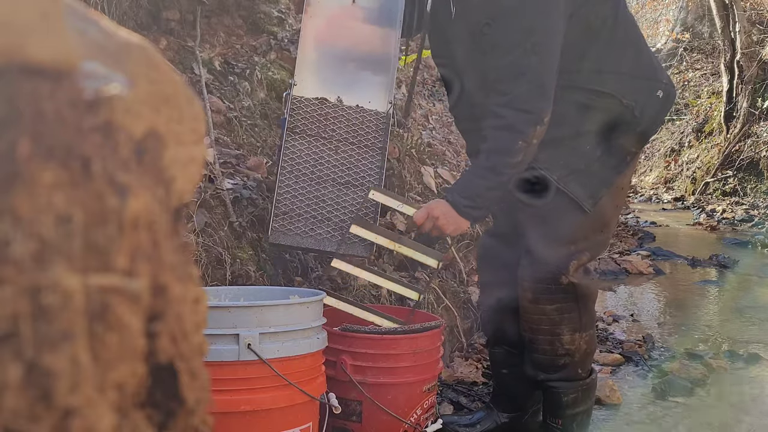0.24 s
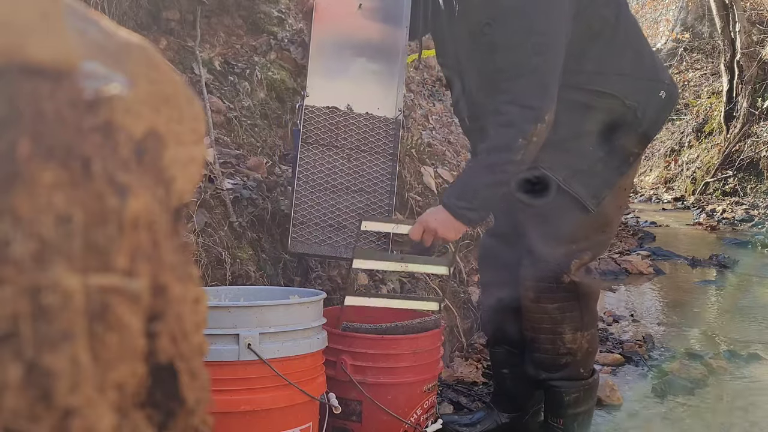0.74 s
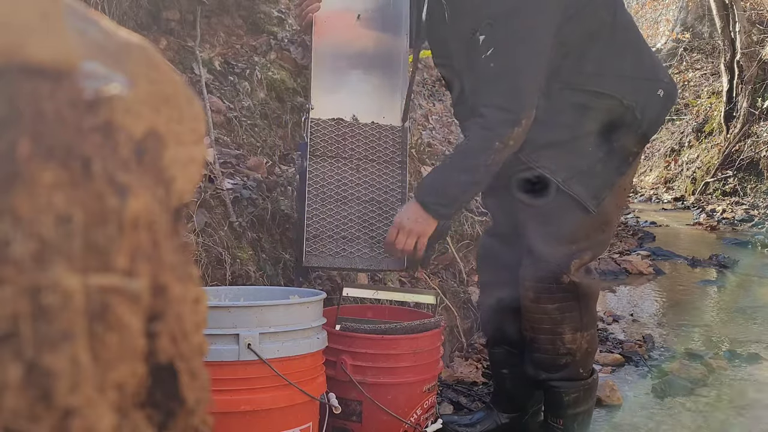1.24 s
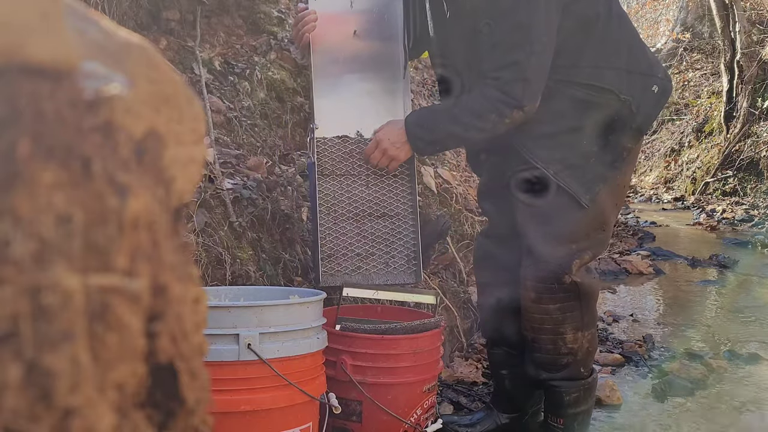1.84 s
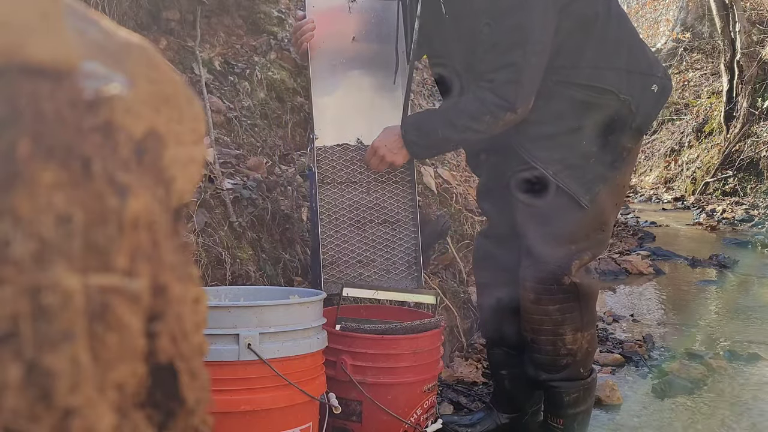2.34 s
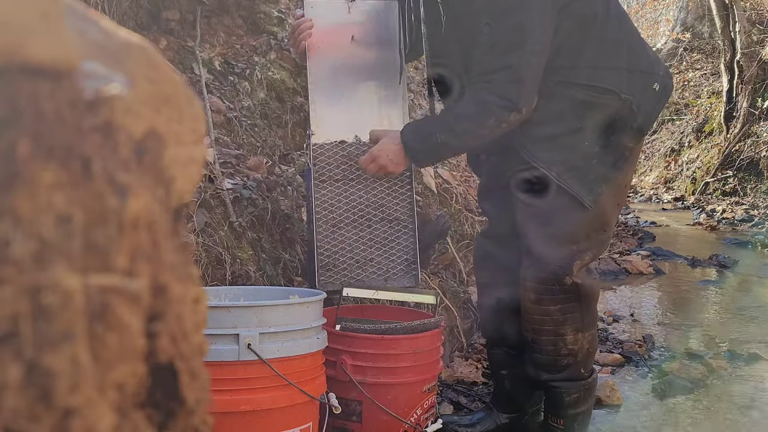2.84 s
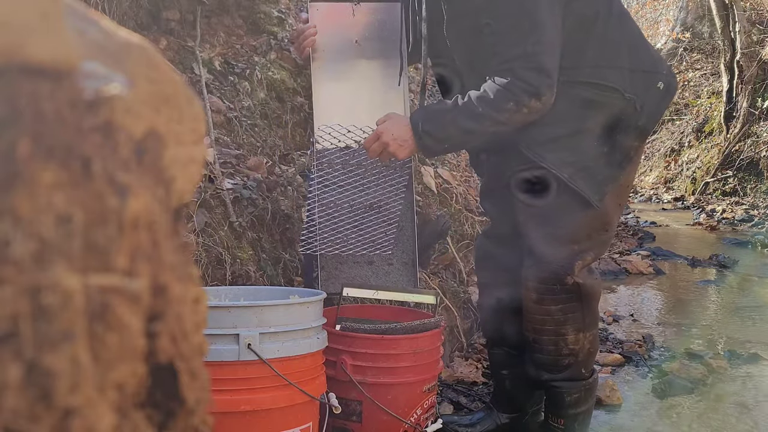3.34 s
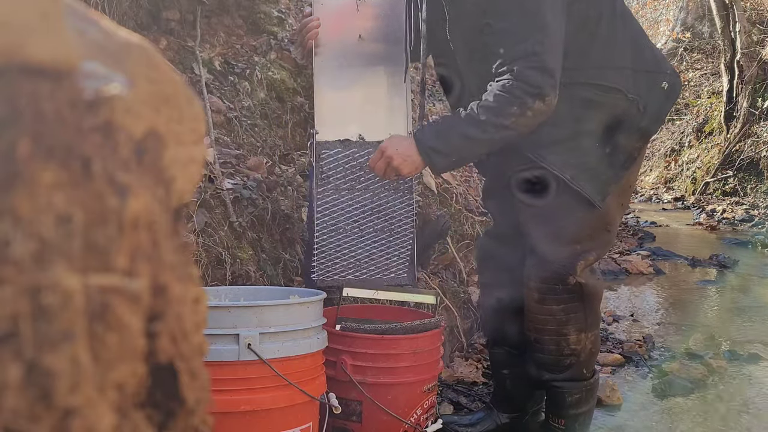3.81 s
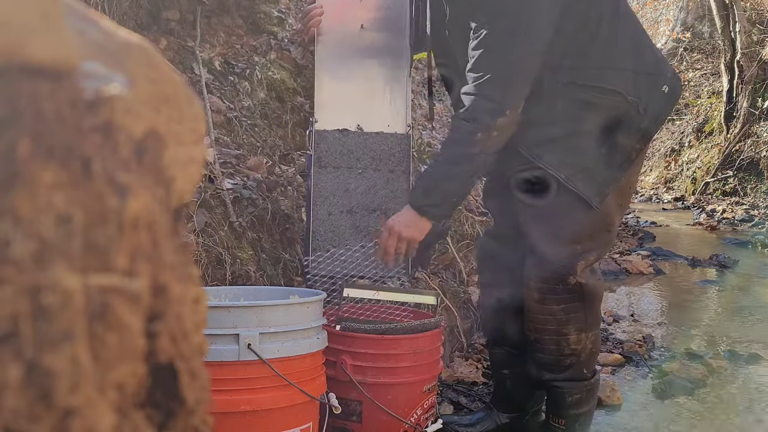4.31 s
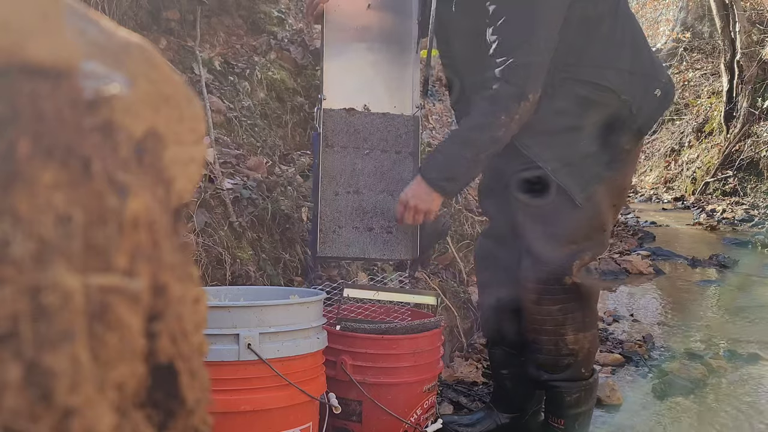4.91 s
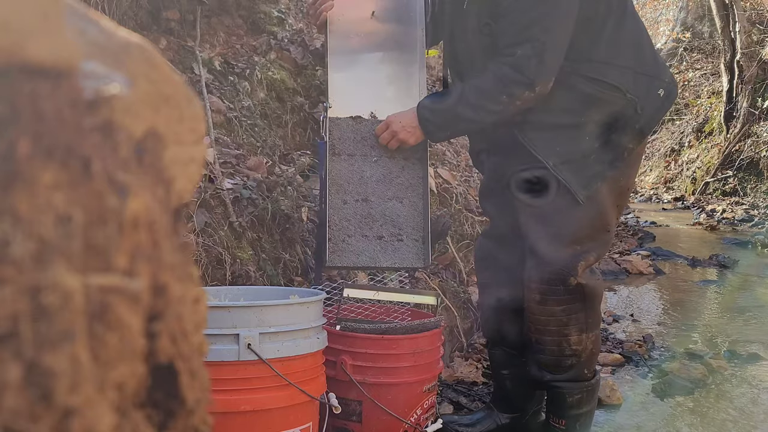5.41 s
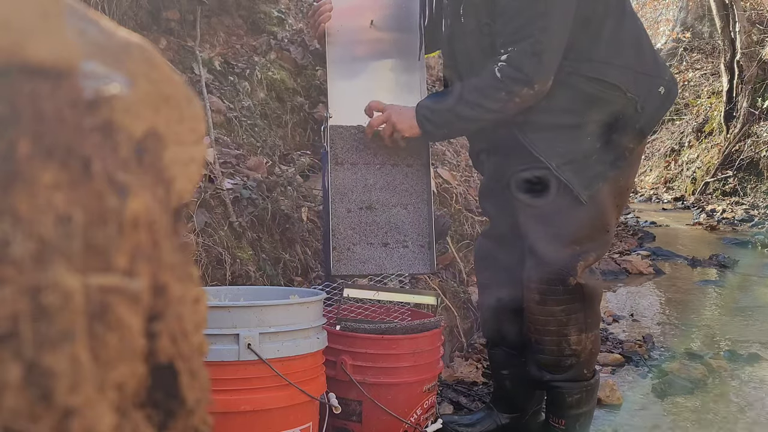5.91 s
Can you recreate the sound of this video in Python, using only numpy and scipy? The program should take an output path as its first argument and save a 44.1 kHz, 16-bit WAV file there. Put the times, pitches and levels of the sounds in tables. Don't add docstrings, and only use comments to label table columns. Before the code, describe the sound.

A close outdoor take of rinsing gear at a stream.

```python
import sys
import numpy as np
from scipy import signal
from scipy.fft import rfft, irfft
from scipy.io import wavfile
from scipy.ndimage import uniform_filter1d

SR = 44100
rng = np.random.default_rng(int(sys.argv[2]) if len(sys.argv) > 2 else 0)


def put_to_file(sound):
    columns = np.atleast_2d(sound).T
    safe = np.clip(columns, -1, 1)
    whole_steps = np.round(safe * 32767)
    wavfile.write(sys.argv[1], SR, whole_steps.astype(np.int16))


def makeup_ratio(level_db):
    decades = np.asarray(level_db, float) / 20
    return 10 ** decades


N = 271656
HZ = np.fft.rfftfreq(N, 1 / SR) + 1e-3


# (frequency in Hz, level in dB, t60 in seconds).
KNOCKS = [
    ([(.5108, -4.5), (.5122, -9), (.5148, -16), (.5178, -8), (.521, -20)], [(274, -15, 0.061), (634, -4, 0.021), (1400, -7, 0.012), (1650, 0, 0.011), (1980, -10, 0.018), (3180, -12, .009), (4200, -9, .011), (4700, -5, 0.012)]),
    ([(.0073, -12), (.0089, -14.5), (.0119, -22)], [(1200, -2.5, 0.024), (1642, -2, .017), (1880, -2, 0.017), (3800, -23, .012)]),
    ([(.683, -2.5), (.685, -11), (.6885, -3.5), (.693, -17)], [(245, -10, 0.11), (413, -8.5, 0.16), (750, -15, 0.067), (1260, -5, 0.021), (1700, -18, .04), (1880, -11, .04), (3480, -24, 0.038), (3860, -13, 0.014), (6830, -18, 0.018)]),
    ([(.748, -24), (.79, -26)], [(6300, -12, .05), (7100, -1.5, 0.13), (8460, -0.5, .07)]),
    ([(1.04, -19), (1.052, -12.5), (1.066, -15)], [(3790, -10.5, .05), (5640, -2, 0.081), (6990, -10, 0.064), (11300, -8, 0.089)]),
          ([(2.615, -15.5), (2.618, -11.5), (2.628, -16.5)], [(292, -0.5, 0.045), (568, -0.5, 0.11), (1410, -18, 0.043), (1830, -9, .03)]),
    ([(3.1035, -16), (3.109, -15), (3.113, -26), (3.14, -20)], [(727, -4.5, 0.041), (884, -6.5, 0.039), (1750, -7, .025), (2730, -16, 0.042)]),
    ([(4.3578, -13.5), (4.360, -16.5), (4.3625, -17), (4.365, -16), (4.3665, -25)], [(134, -14, .15), (207, -4.5, 0.18), (368, -8, 0.15), (560, -4.5, 0.056), (866, 2, 0.017), (1230, -2, 0.02), (1700, 0.5, 0.025), (2100, -23, .03)]),
    ([(4.6455, -18), (4.648, -20), (4.652, -24.5), (4.666, -20), (4.678, -25)], [(206, -10, 0.064), (392, -3.5, 0.05), (530, -7, 0.045), (840, -3, 0.033), (1250, -3.5, 0.021), (1710, -5, .025)]),
    ([(4.5865, -12), (4.589, -21)], [(2234, -4.5, 0.015), (2885, 2, .012), (3500, -7, .01), (4160, -8, .012)]),
    ([(4.616, -16), (4.6235, -25)], [(2900, -12, .012), (3980, -3.5, 0.029), (5100, -8, .015)]),
]
CRACK_DB, CRACK_T60_S = -5.5, 0.014


def knocks():
    out, t = np.zeros(N), np.arange(2000) / SR
    for contacts, modes in KNOCKS:
        start, clicks = contacts[0][0] - .01, np.zeros(SR // 3)
        for s, blow_db in contacts:
            clicks[round((s - start) * SR)] = makeup_ratio(blow_db)
            crack = band(rng.standard_normal(len(t)), 570, 6200)
            add(out, s, makeup_ratio(blow_db + CRACK_DB - 60 * t / CRACK_T60_S) * crack)
        ringing = 0
        for k, (hz, level_db, t60_s) in enumerate(modes):
            ringing = ringing + makeup_ratio(level_db) * (-1) ** k * ring(clicks, hz, t60_s)
        add(out, start, ringing)
    return out


# start in seconds, length in seconds,
# metal level in dB, bucket level in dB, rasp level in dB.
STROKES = [(0.6, 0.035, -48, -40, -30), (0.644, 0.048, -29, -45, -29), (0.686, 0.033, -34, -42, -26),
           (0.746, 0.023, -23, -30, -29), (0.786, 0.09, -25.5, -30, -27), (0.888, 0.04, -32, -46, -28),
           (0.93, 0.012, -25, -42, -37), (0.943, 0.03, -23.5, -42, -30.5), (0.985, 0.055, -23, -40, -29),
           (1.048, 0.02, -18, -33, -27), (1.075, 0.033, -25.5, -31, -24)]
# frequency in Hz, width in Hz, level in dB.
LADDER_HIGH = [(4540, 27, -1), (6300, 55, -10), (6900, 32, -6), (7250, 41, 4), (8460, 44, -6),
               (10900, 56, -13), (13000, 79, -5), (13600, 90, -13), (14300, 82, -1)]
# frequency in Hz, width in Hz, level in dB.
LADDER_LOW = [(3790, 41, -5), (5580, 53, 2), (6500, 93, -2), (6990, 96, 4), (7640, 53, 1), (9340, 61, -13),
              (11330, 58, -6), (12700, 140, -10), (14700, 150, -7)]
# frequency in Hz, width in Hz, level in dB.
BUCKET = [(240, 42, -14), (318, 20, 14), (413, 54, -3), (560, 89, -30)]
# frequency in Hz, width in Hz, level in dB.
TRAY = [(730, 250, 1), (1195, 15, 10), (1710, 140, 13), (1980, 66, 9.5), (3800, 280, 8), (4600, 200, 6)]
GRIP_S, LET_GO_DB_PER_S, TIRE_DB_PER_S = 0.0054, 330, 17
SUNK_S = .91


def slide():
    t, press = np.arange(N) / SR, 0
    for s, length_s, *levels_db in STROKES:
        tire_db = TIRE_DB_PER_S * np.clip(t - s, 0, length_s)
        let_go_db = LET_GO_DB_PER_S * np.clip(t - s - length_s, 0, 1)
        shape = np.clip((t - s) / GRIP_S, 0, 1) * makeup_ratio(-tire_db - let_go_db)
        press = press + np.outer(makeup_ratio(np.array(levels_db)), shape) ** 2
    metal, wall, rasp = np.sqrt(press)
    sunk = np.clip((t - SUNK_S) / .04 + .5, 0, 1)
    upper = rubbed(LADDER_HIGH, 9000, hiss=2.2, waver_db=3.0)
    lower = rubbed(LADDER_LOW, 9000, hiss=1.8, waver_db=2.0)
    ladder = np.sqrt(1 - sunk) * upper + np.sqrt(sunk) * lower
    drone = rubbed(BUCKET, 300, hiss=0.47, waver_db=-3.0)
    scrape = rubbed(TRAY, 1500, hiss=1.35, waver_db=4.5)
    return metal * ladder + wall * drone + rasp * scrape


def rubbed(modes, per_s, hiss, waver_db):
    size = 2 * SR
    slips = rms_one(grains(per_s, 1.6)[:size] * makeup_ratio(1.1 * drift(26, size)))
    body = 0
    for hz, width_hz, level_db in modes:
        mode = rms_one(ring(slips, hz, 2.2 / width_hz))
        body = body + makeup_ratio(level_db + waver_db * drift(12, size)) * mode
    low_hz, high_hz = modes[0][0], modes[-1][0]
    friction = rms_one(band(slips, low_hz / 1.57, high_hz * 1.2))
    sound = rms_one(rms_one(body) + hiss * friction)
    return np.pad(sound, (0, N - size))


# start in seconds, length in seconds, frequency in Hz, level in dB.
SONGS = [(.748, .006, 6440, -30), (.761, .013, 14900, -27), (.762, .008, 12300, -32),
         (.768, 0.0062, 10900, -30), (0.77, 0.018, 8460, -30), (0.79, .012, 7250, -30),
         (.805, 0.051, 7250, -29.5), (0.807, .01, 14200, -29), (.84, .025, 15660, -32),
         (.79, 0.096, 4540, -33), (.948, .012, 7250, -29), (.95, .005, 5800, -28), (.964, .014, 6500, -25),
         (.988, .01, 6510, -25), (.967, .03, 11000, -36), (1.008, .025, 5110, -33), (1.02, .015, 7100, -30),
         (1.037, 0.013, 11330, -31), (1.091, 0.017, 11330, -35), (1.06, .018, 7100, -25),
         (.812, 0.0077, 290, -25.5), (0.832, 0.042, 318, -26.5), (.86, 0.013, 1430, -30),
         (.965, .04, 1895, -32), (1.003, 0.0064, 1265, -26.5), (.915, .012, 1720, -31),
         (1.088, 0.011, 1264, -26), (.686, .026, 7050, -29), (.692, .005, 3950, -22.5),
         (.708, 0.027, 420, -19), (1.04, .006, 5700, -25), (1.051, .03, 5570, -28),
         (1.055, .012, 3800, -30), (1.26, .17, 293, -38.5)]
SONG_WIDTH, SONG_RISE_S, SONG_T60_S = 0.015, .002, 0.044


def songs():
    out, t = np.zeros(N), np.arange(6000) / SR
    for s, length_s, hz, level_db in SONGS:
        noise = rng.standard_normal(2 * len(t))
        tone = rms_one(ring(noise, hz, 2.2 / (SONG_WIDTH * hz + 12))[len(t):])
        fall = makeup_ratio(level_db - 60 * np.maximum(t - length_s, 0) / SONG_T60_S)
        add(out, s, fall * np.minimum(t / SONG_RISE_S, 1) * tone)
    return out


# start in seconds, peak in dB, ring in Hz, clack in dB.
TAPS = [(0.078, -19.5, 360, -1), (0.421, -21.5, 390, 0), (0.55, -18, 234, -13), (0.526, -9.5, 188, -4),
        (0.534, -5.5, 282, -12), (0.628, -15.5, 420, -4), (0.699, -14, 413, 2), (0.915, -15, 337, -9),
        (1.069, -16, 285, -14), (1.085, -10, 357, -5), (1.114, -13, 327, -10), (2.233, -17, 378, -25),
        (2.818, -22, 365, -2), (2.853, -22, 393, -8.5), (4.171, -14.5, 1786, -14), (4.206, -12, 383, -14),
        (4.232, -15, 199, -9), (4.372, -9.5, 377, -6.5), (4.386, -15, 224, -22), (4.401, -16.5, 221, -6),
        (4.448, -18.5, 800, 1), (5.058, -20.5, 1780, -6), (5.218, -23.5, 415, -12),
        (5.617, -18.5, 380, -23), (5.744, -21, 1710, -10), (5.861, -18, 230, -17), (5.966, -22, 220, -13)]
TAP_T60_S = 0.075


def taps():
    out, t = np.zeros(N), np.arange(8000) / SR
    for s, peak_db, hz, clack_db in TAPS:
        note = np.sin(2 * np.pi * hz * t) * makeup_ratio(-60 * t / TAP_T60_S) * np.minimum(t / 0.0028, 1)
        noise = rms_one(band(rng.standard_normal(len(t)), 390, 1360))
        clack = noise * makeup_ratio(clack_db - 60 * t / 0.05)
        add(out, s, makeup_ratio(peak_db - 2.5) * (note + clack))
    return out


# start in seconds, peak in dB,
# centre in Hz.
TICKS = [(0.0074, -30, 1810), (0.081, -12, 1780), (0.6828, -6, 1770), (0.6832, 3, 5000), (0.683, -7, 10000),
         (0.686, -7, 5500), (0.5122, -7, 3600), (0.517, -14, 4000), (2.62, -19, 2200), (1.0511, -14, 6500),
         (1.0586, -14, 9000), (1.4481, -35, 1750), (2.8214, -32, 2280), (3.104, -63, 1770),
         (3.3324, -36, 1760), (4.226, -22, 1400), (4.2344, -30, 2350), (4.4522, -25, 1710),
         (4.586, -15, 2800), (4.6166, -6, 4010), (0.435, -11, 1400), (5.052, -8, 1300), (6.094, -19, 2000)]


def ticks():
    out, t = np.zeros(N), np.arange(600) / SR
    for s, peak_db, hz in TICKS:
        snap = rms_one(band(rng.standard_normal(len(t)), hz / 1.6, hz * 1.7))
        add(out, s, makeup_ratio(peak_db - 3.0 - 60 * t / 0.011) * np.minimum(t / 0.0019, 1) * snap)
    return out


# start in seconds, peak in dB, centre in Hz, left over right in dB.
SPLASHES = [(0.073, -7, 12800, -9), (0.165, -11.5, 6930, 1), (0.597, -18, 5870, -4.5),
            (0.632, -9, 14900, -6), (0.657, -8, 3790, -1.5), (0.686, -12, 6920, 1), (1.055, -8, 5600, -3),
            (1.452, -9, 6700, -13), (1.542, -12.5, 7010, -20), (1.653, -10, 6140, -4),
            (2.2846, -10.5, 6600, -11), (3.016, -17, 7100, -19), (3.104, -9, 6190, -16),
            (3.271, -3, 13600, -5), (3.333, -15, 14600, 0), (3.761, -11.5, 3840, 18),
            (3.9414, -13, 11700, -7), (4.113, -9.5, 6230, -10), (4.211, -9, 5580, -2.5),
            (4.3, -13, 6310, -14), (4.4543, -31, 6440, -5), (4.9561, -9, 13100, 13), (5.05, -12, 6600, -5),
            (5.487, -13, 5710, -14), (5.657, -11.5, 6330, 10)]
SPLASH_S = 0.016


def splashes():
    out, t = np.zeros((2, N)), np.arange(4000) / SR
    for s, peak_db, hz, pan_db in SPLASHES:
        puff = rms_one(band(rng.standard_normal(len(t)), hz / 1.11, hz * 1.15))
        shape = t / SPLASH_S * np.exp(1 - t / SPLASH_S * 2.84) * 2.77
        pan = makeup_ratio(np.clip(pan_db, -7, 1) * np.array([[.5], [-.5]]))
        add(out, s - .002, makeup_ratio(peak_db - 19.5) * puff * shape * pan)
    return out


# time in seconds, rush in dB.
FLOW = [
    [(0.0, -32), (0.328, -34), (0.45, -32.5)],
    [(1.2, -34.5), (1.35, -37.5), (1.7, -37), (4.07, -36.5), (4.42, -34), (5.32, -37), (6.16, -36)],
]
# frequency in Hz, level in dB per Hz.
CREEK = [(30, -22), (60, -5.5), (130, -3), (300, -5), (450, -8.5), (600, -5), (1000, -3), (2500, -9.5),
         (4500, -12), (5200, -6), (7000, -6), (7900, -16), (9800, -14), (12500, -10)]
# frequency in Hz, width in Hz, lift in dB.
NEAR_PEAKS = [(130, 29, 5), (216.6, 18, 7.5), (394, 55, 2.5), (555, 89, 3.5), (3246, 1690, 7)]
# frequency in Hz, level in dB.
FAR_SHADE = [(100, 0), (500, -4), (1000, -4), (2400, 1.5), (3200, -3), (6000, -7.5), (7100, -10),
             (7700, -2), (8900, 1), (9300, -8), (14000, -7), (15600, -5)]
# frequency in Hz, width in Hz, lift in dB.
FAR_PEAKS = [(398.6, 145, 15), (516, 47, 4.5), (628, 102, -5), (1273, 270, 8.5), (1400, 720, -7),
             (1780, 220, 10.5), (2690, 246, -9.5), (3986, 130, 8.5), (7100, 260, 11.5)]
CREEK_DB, BUBBLE_DB = -25, -4.5
SPRAY_FOLLOWS, GURGLE_FOLLOWS = 0.23, 1
GUSH_RUSH, GUSH_GURGLE = 0.74, 0.66
RUMBLE_HZ = 111
NEAR_ECHO_S, NEAR_ECHO = .0054, 0.14


def creek():
    surge_db, spit_db, slosh_db, patch_db, flicker_db = 0.38, 1.18, 1.5, 0.88, 2.0
    flow_s, flow_db = np.transpose(np.vstack(FLOW))
    rush_db = np.interp(np.arange(N) / SR, flow_s, flow_db)
    rush_db, gush_db = rush_db - np.median(rush_db), gushes()
    spray_flow_db = SPRAY_FOLLOWS * rush_db + gush_db
    rush_flow_db = rush_db + GUSH_RUSH * gush_db
    gurgle_flow_db = GURGLE_FOLLOWS * rush_db + GUSH_GURGLE * gush_db
    white, water = rng.standard_normal((2, 3, N)), 0
    surge = surge_db * drift(9.6) + spit_db * drift(93)
    slosh = slosh_db * drift(9.3)
    edges = 25 * 2 ** np.arange(0, 9.5, 1 / 3)
    for k, (low_hz, high_hz) in enumerate(zip(edges, edges[1:])):
        hz = np.sqrt(low_hz * high_hz)
        if k % 3 == 0:
            patch = patch_db * drift(7.6)
        to_rush, to_spray = np.clip(np.log2(hz / 400), 0, 1), np.clip(np.log2(hz / 2000), 0, 1)
        swell_db = (1 - to_rush) * gurgle_flow_db + (to_rush - to_spray) * rush_flow_db
        swell_db = swell_db + to_spray * spray_flow_db
        swell_db = swell_db + to_rush * surge + (1 - to_rush) * slosh + patch
        swell_db = swell_db + flicker_db * (1 - 0.24 * to_spray) * drift(23.4)
        swell_db = swell_db * np.clip(np.log2(hz / RUMBLE_HZ) + 0.51, .15, 1)
        noise = band(white[k % 2], low_hz, high_hz)
        spread_db = 2.3 + 1.0 * to_rush - .5 * to_spray
        t60_s = (14.7 + 13.0 * to_rush) / hz + 0.0065 * to_spray
        pops = bubbles(hz, .04 * hz + 30, spread_db, t60_s)
        noise[0] += makeup_ratio(BUBBLE_DB) * pops * noise[0].std()
        water = water + makeup_ratio(swell_db) * noise
    both = ports(water[0], water[1:], direct=0.023, diffuse=0.82) * makeup_ratio(at_hz(CREEK, HZ))
    both[0] *= makeup_ratio(at_hz(FAR_SHADE, HZ)) * peaks(FAR_PEAKS)
    both[1] *= 1 + NEAR_ECHO * np.exp(-2j * np.pi * HZ * NEAR_ECHO_S) / (1 + (HZ / 3000) ** 2)
    both = irfft(both * peaks(NEAR_PEAKS), N)
    return makeup_ratio(CREEK_DB) * both / both[1].std()


def bubbles(hz, per_s, spread_db, t60_s):
    bursts = grains(per_s, spread_db) + 1e-18
    dying = signal.lfilter([1], [1, -makeup_ratio(-60 / (t60_s * SR))], bursts)
    pitch_hz = hz * 2 ** (.13 * drift(25))
    return rms_one(dying * np.sin(2 * np.pi * np.cumsum(pitch_hz) / SR))


# time of the top in seconds, lift in dB.
GUSHES = [(.01, 4), (.165, 1.5), (1.46, 1.5), (1.85, 1.5), (2.0, 2.5), (2.24, 1.5), (2.65, 5.5), (2.715, 5),
          (3.275, 4), (3.42, 3), (3.95, 2), (4.22, 2), (4.312, 7.5), (4.46, 4.5), (4.52, 3.5), (5.05, 4),
          (5.23, 6), (5.77, 3), (5.99, 2.5), (6.1, 1.5)]
GUSH_RISE_S, GUSH_FALL_S = 0.024, 0.033


def gushes():
    t, out = np.arange(N) / SR, 0
    for s, lift_db in GUSHES:
        rise, fall = 1 + (t - s) / GUSH_RISE_S, 1 - (t - s) / GUSH_FALL_S
        out = out + lift_db * np.clip(np.minimum(rise, fall), 0, 1)
    return out


# frequency in Hz, share common to both.
LIKENESS = [(30, 0.7), (100, 1), (300, 0.92), (900, 0.84), (1300, 0.37), (3200, 0.58), (6000, 0.36),
            (6400, 0.65), (12000, 1)]
PORT_LAG_S, JOINED_HZ = 22 / SR, 6250


def ports(common, own, direct, diffuse):
    turn = -2 * np.pi * HZ * PORT_LAG_S + 0.27 / (1 + (HZ / 250) ** 2)
    late = np.where(HZ < JOINED_HZ, direct + (1 - direct) * np.exp(1j * turn), 1)
    unlike = np.clip(diffuse * (1 - at_hz(LIKENESS, HZ)), 0, 1)
    shared = rfft(common) * np.array([late, late ** 0])
    return np.sqrt(1 - unlike) * shared + np.sqrt(unlike) * rfft(own)


def rms_one(x):
    return x / np.sqrt(np.mean(x ** 2) + 1e-20)


def at_hz(points, hz):
    points_hz, values = np.transpose(points)
    return np.interp(np.log(hz), np.log(points_hz), values)


def peaks(rows):
    out = 1
    for hz, width_hz, lift_db in rows:
        off, damp = hz ** 2 - HZ ** 2, 1j * HZ * width_hz
        out = out * (off + damp * makeup_ratio(lift_db / 2)) / (off + damp / makeup_ratio(lift_db / 2))
    return out


def drift(rate_hz, size=N):
    r = np.exp(-80 * np.pi * rate_hz / SR)
    noise = rng.standard_normal(size // 40 + 2002)
    slow = signal.lfilter([1], [1, -2 * r, r * r], noise)[2000:]
    slow = slow - uniform_filter1d(slow, size=250)
    return np.interp(np.arange(size) / 40, np.arange(len(slow)), rms_one(slow))


def ring(clicks, hz, t60_s):
    r, w = makeup_ratio(-60 / (t60_s * SR)), 2 * np.pi * hz / SR
    return signal.lfilter([0, np.sin(w)], [1, -2 * r * np.cos(w), r * r], clicks + 1e-18)


def grains(per_s, spread_db):
    out, at = np.zeros(N), rng.integers(0, N, int(per_s * N / SR))
    size_db = spread_db * np.minimum(rng.exponential(1, len(at)), 5)
    out[at] = makeup_ratio(size_db) * rng.choice([-1, 1], len(at))
    return out


def band(x, low_hz, high_hz):
    edges = np.clip([low_hz, high_hz], 15, .47 * SR)
    return signal.sosfilt(signal.butter(2, edges, "band", fs=SR, output="sos"), x)


def add(track, s, sound):
    at = max(round(s * SR), 0)
    track[..., at:at + sound.shape[-1]] += sound[..., :N - at]


# frequency in Hz, level in dB.
WORK_SHADE = [(150, 2.5), (400, 1.5), (900, 6), (3000, -5.5), (10000, 3.5)]


def scene():
    work = knocks() + slide() + songs() + taps() + ticks()
    water = splashes() + creek()
    t = np.arange(3000) / SR
    smear = rms_one(rng.standard_normal((2, len(t)))) * makeup_ratio(-22.0 - 60 * t / 0.059)
    own = signal.fftconvolve(work[None], smear, axes=1)[:, :N]
    heard = ports(work, own, direct=0.58, diffuse=0.55) * makeup_ratio(-0.8)
    heard = heard * peaks([(1250, 640, 2.0)])
    heard[0] *= makeup_ratio(at_hz(WORK_SHADE, HZ))
    return water + irfft(heard, N)


def roll_off(x):
    return signal.sosfilt(signal.butter(12, 17090, fs=SR, output="sos"), x)


def record(dry):
    cutoff_hz = 15850
    rounded = 1.364 * np.tanh(dry / 1.43)
    cut = np.clip((cutoff_hz - HZ) / 150 + .5, 0, 1) ** 2
    mix = irfft(rfft(rounded) * cut, N)
    return roll_off(mix)


dry = scene()
out = record(dry)
put_to_file(out)
```